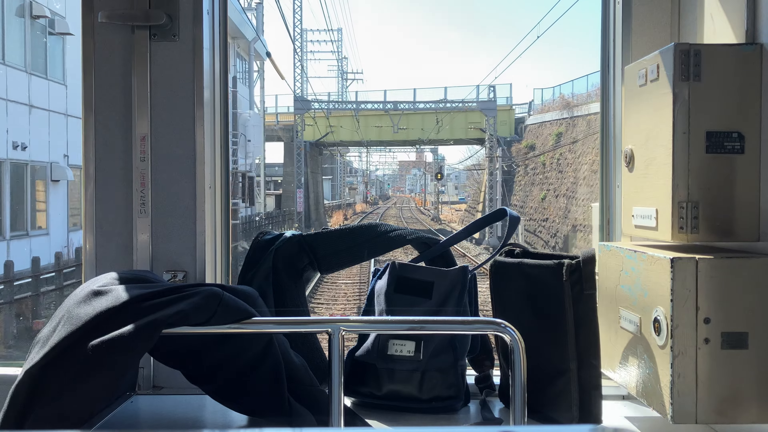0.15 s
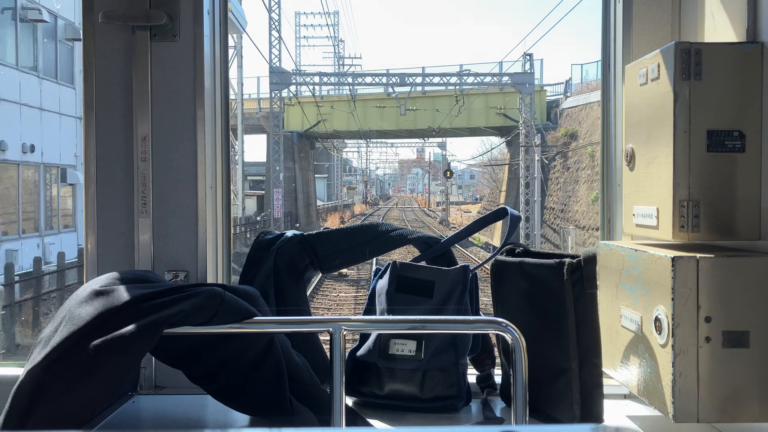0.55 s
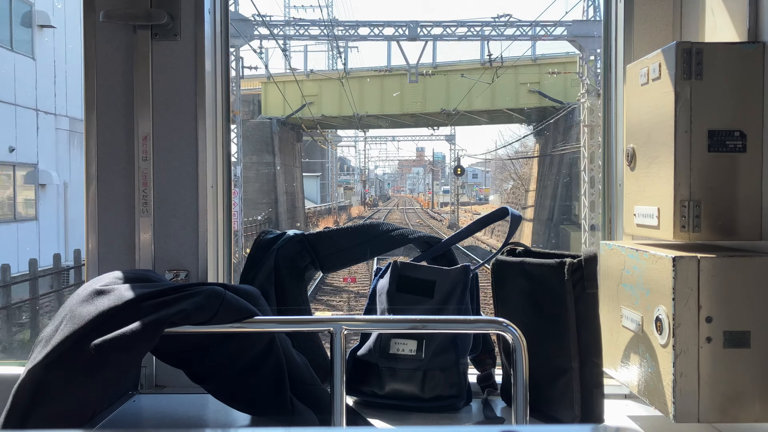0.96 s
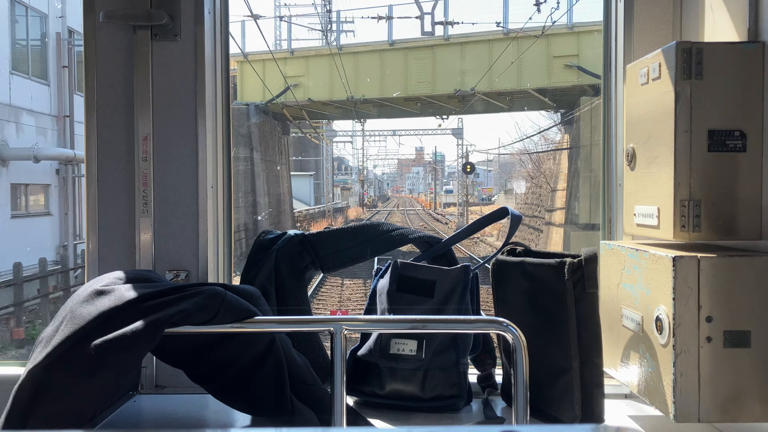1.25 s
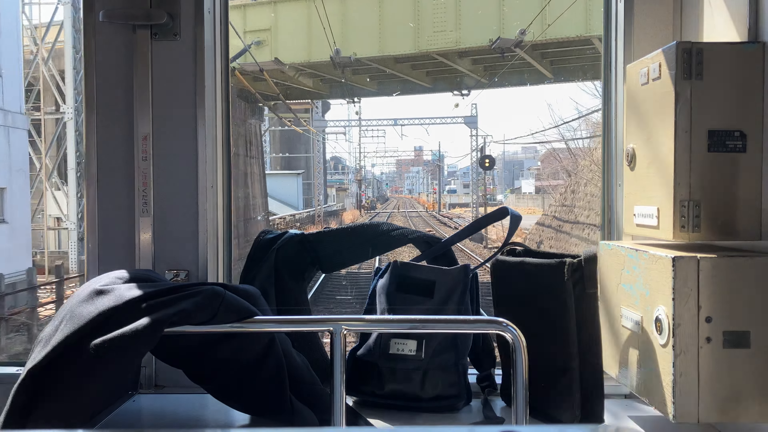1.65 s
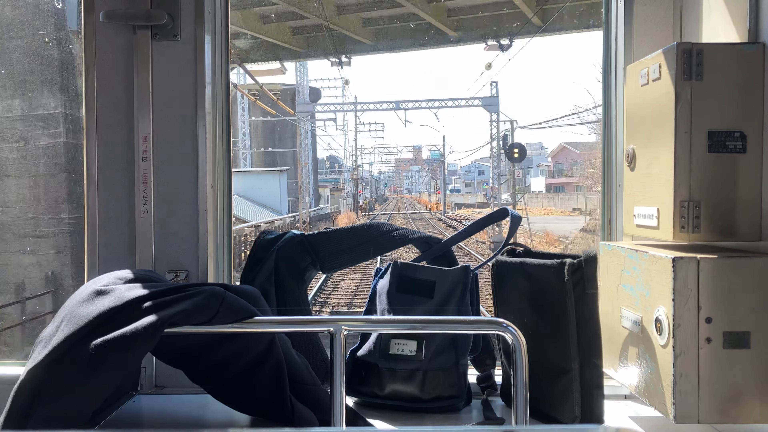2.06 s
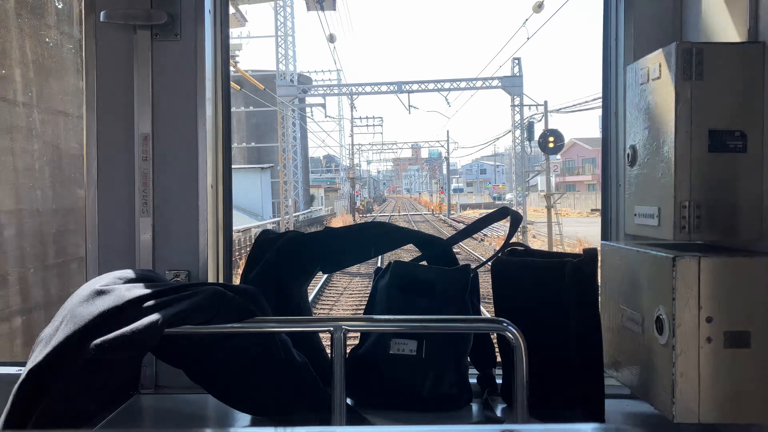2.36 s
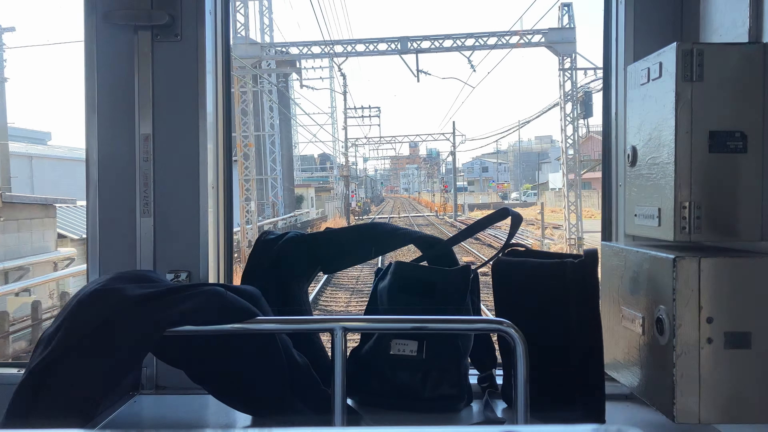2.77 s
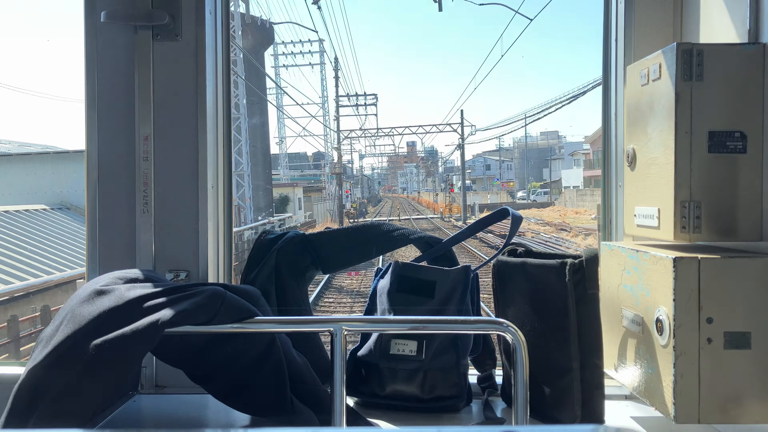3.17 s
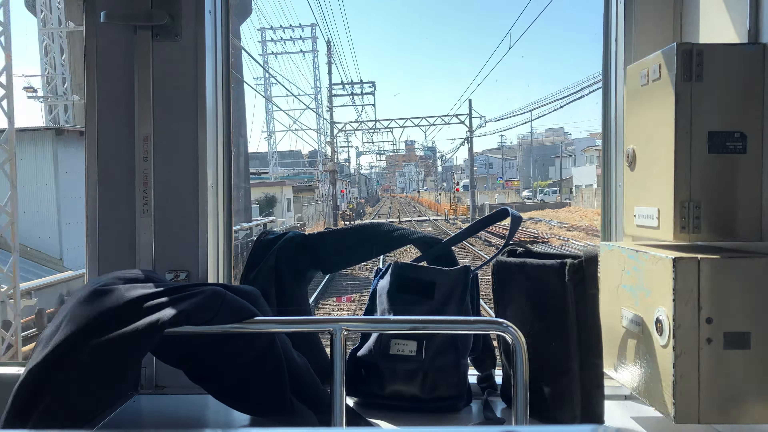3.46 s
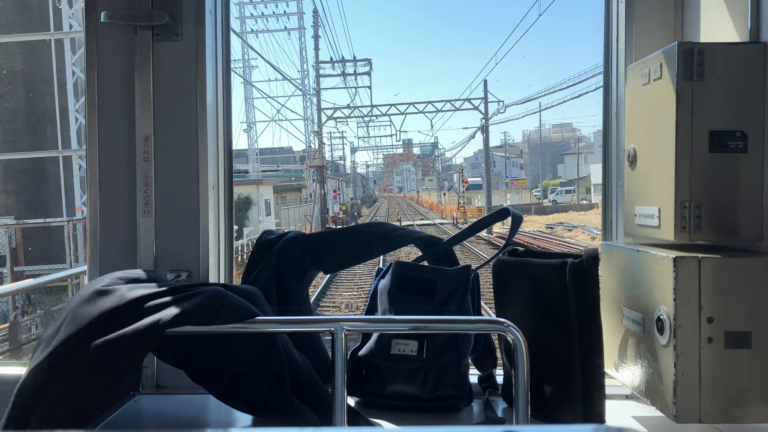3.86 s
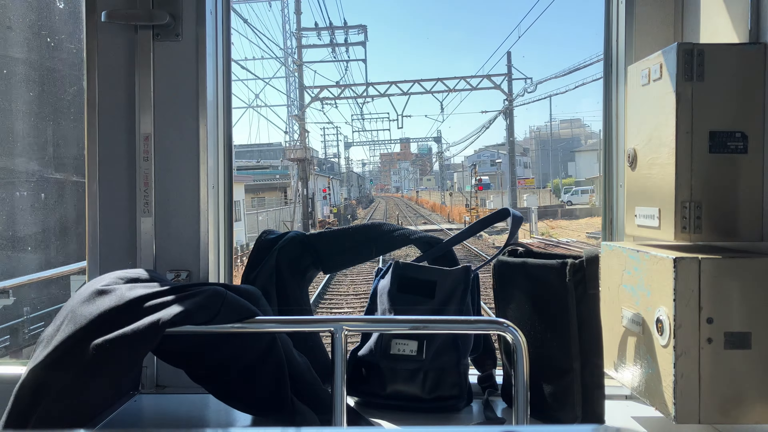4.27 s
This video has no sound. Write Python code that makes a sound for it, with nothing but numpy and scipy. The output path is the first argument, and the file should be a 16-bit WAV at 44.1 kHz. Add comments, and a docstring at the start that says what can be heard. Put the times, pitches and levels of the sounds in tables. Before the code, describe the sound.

Inside a front train car at steady speed, a bass-heavy floor rumble and body boom shake in uneven lumps under a mid-low wheel roar. A knock opens it, floor bumps cluster just after one second, sharp ticks come from a cab fitting near 2.7 and 4.1 seconds, and heavier joint thuds arrive near 3.9. Faint air hiss and a thin gear whine run along. Close stereo microphone in the enclosed cabin.

```python
"""Rough rails shake the floor and make the body boom in the front car of an electric train at steady speed.
Heard just behind the cab: shaped noise makes the floor, body and wheel roar, a wavering sine the gear whine.
Decaying modes make the thuds over rail joints, the floor's bumps over dips and the ticks of loose cab fittings.
Bands of noise make the air hiss, the brushing wheel flanges and a faint, very high sizzle."""
import sys
import numpy as np
from scipy import signal
from scipy.fft import rfft, irfft, next_fast_len
from scipy.io import wavfile
from scipy.ndimage import uniform_filter1d, map_coordinates

SR = 44100
rng = np.random.default_rng(int(sys.argv[2]) if len(sys.argv) > 2 else 0)


def log_audio(samples):
    """Write samples as a 16-bit WAV file to the path given in sys.argv[1]."""
    # one column per channel
    frames = np.atleast_2d(samples).T
    # limit to full scale, then quantise
    limited = np.clip(frames, -1, 1)
    pcm = np.round(limited * 32767).astype(np.int16)
    wavfile.write(sys.argv[1], SR, pcm)


N = 194833

# rise and fall of a rough stretch or a flange brush, and of a bounce or a passing wall (seconds)
JOLT_EDGE_S, BOUNCE_EDGE_S = 0.061, 0.08
# the floor and the body shake in random lumps: knots per second, depth in dB
LUMPS_PER_S, LUMPS_DB = 20, 2.1


def amp(db):
    """Decibels to gain."""
    return 10 ** (np.asarray(db) / 20)


def unit(x):
    """Scaled to rms 1."""
    return x / np.sqrt(np.mean(x ** 2) + 1e-20)


def along(points, hz):
    """(Hz, value) points read on a log frequency axis."""
    f, v = np.transpose(points)
    return np.interp(np.log(hz + 1), np.log(f + 1), v)


def curve(points):
    """(seconds, value) points as one value per sample, with rounded corners."""
    s, v = np.transpose(points)
    return uniform_filter1d(np.interp(np.arange(N) / SR, s, v), size=500)


def wobble(rate):
    """A smooth random curve through rate knots a second."""
    knots = rng.standard_normal(int(N * rate / SR) + 4)
    return map_coordinates(knots, [np.arange(N) * rate / SR], mode="nearest")


def swells(rows, edge_s):
    """A lift from (start s, length s, height) rows: each rises, holds and falls."""
    t = np.arange(N) / SR

    def ramp(x):
        return 0.5 + 0.5 * np.sin(np.pi * np.clip(x / edge_s, -0.5, 0.5))

    return sum(height * ramp(t - s) * ramp(s + length - t) for s, length, height in rows)


def burst(s, rise, t60):
    """The envelope of a blow at s seconds: a quick rise, then a fall of 60 dB in t60 seconds."""
    t = np.arange(SR) / SR
    start = max(round(s * SR), 0)
    envelope = (1 - np.exp(-t / rise)) * amp(-60 * t / t60)
    return np.pad(envelope, (start, N))[:N]


def filtered(x, response):
    """x shaped by a response, a function of frequency in Hz."""
    size = next_fast_len(N + SR // 2)
    hz = np.fft.rfftfreq(size, 1 / SR)
    return irfft(rfft(x, size) * response(hz), size)[..., :N]


def even(x, seconds):
    """Noise with its slow chance swells evened out, to a running rms near 1."""
    window = signal.windows.hann(int(seconds * SR))
    energy = signal.fftconvolve(np.mean(x ** 2, axis=0), window, "same")
    power = energy / signal.fftconvolve(np.ones(N), window, "same")
    return x / np.sqrt(np.abs(power) + 1e-9)


def panned(db):
    """Left and right gains for a left-right level difference."""
    return amp(np.array([db, -db]) / 2)


def body_db(hz):
    """The car body and the cabin air resonate, which lifts bands of the sound."""
    # Each row: centre in Hz, width in Hz, lift in dB.
    resonances = [(71.7, 4.7, 2.5), (105, 28, 1.5), (134.5, 11, 5.5), (178, 29, 2.5), (224, 28, 1),
                  (283, 53, 4.5), (370, 27, 4.5), (433, 9.6, 7.5), (560, 31, 3), (791, 81, 6.5),
                  (1057, 21, 3.5), (1274, 110, 4), (1510, 150, 0)]
    return sum(db / (1 + (2 * (hz - centre) / width) ** 2) for centre, width, db in resonances)


def ripple_db(hz):
    """The cabin's countless small resonances leave a fine ripple, steady in time and drawn at each call."""
    spacing_hz = 22
    depth_db = [(200, 0), (900, 1.7), (3000, 1.5), (6000, 0.8)]  # (Hz, dB)
    knots = rng.standard_normal(int(SR / 2 / spacing_hz) + 2)
    return along(depth_db, hz) * map_coordinates(knots, [hz / spacing_hz], mode="nearest")


def cabin_noise(spectrum):
    """Stereo noise of rms 1 in the cabin: alike in the bass, diffuse above, reaching the left side first."""
    # Likeness of left and right. Each row: frequency in Hz, likeness (1 is identical).
    alike = [(50, .995), (110, .96), (180, .84), (260, .58), (450, .52), (700, .32), (1200, .1),
             (9000, .08)]
    # Left-right balance. Each row: frequency in Hz, left minus right in dB.
    tilt = [(40, 3), (75, -1), (140, -1.5), (200, -0.5), (350, 4.5), (500, 1), (900, 3.5), (1900, 1.5),
            (2400, 4), (2950, 9.5), (3500, 3), (4300, 1), (5500, -5.5), (8000, -1.5)]
    lag_s = 0.0004

    def colour(hz):
        # the less alike the sides, the more of the noise goes to the difference signal
        turn = np.arccos(np.clip(along(alike, hz), -1, 1)) / 2
        shares = np.array([np.cos(turn) * amp(ripple_db(hz)), np.sin(turn) * amp(ripple_db(hz))])
        return amp(along(spectrum, hz) + body_db(hz)) * shares

    def ports(hz):
        # the left leads and the right trails by half the lag, which shrinks below 200 Hz
        delay_s = lag_s * np.clip(hz / 200, 0, 1)
        turns = np.exp(np.pi * hz * delay_s * np.array([[1j], [-1j]]))
        return panned(along(tilt, hz)) * turns

    mid, side = filtered(rng.standard_normal((2, N)), colour)
    return unit(filtered(np.array([mid + side, mid - side]), ports))


def favoured(modes, strongest_hz, focus_db, width_hz):
    """The point of contact favours the modes near one frequency; those far away lose focus_db."""
    def loss_db(hz):
        return focus_db * (1 - np.exp(-((hz - strongest_hz) / width_hz) ** 2))

    return [(hz, db - loss_db(hz), *rest) for hz, db, *rest in modes]


def ringing(s, modes, rise):
    """(Hz, dB, t60 s) modes struck at s seconds, their strengths varied a little; the left side leads."""
    t = np.arange(SR // 2) / SR
    lead_s = np.array([[0.0003], [0]])
    ring = 0
    for k, (hz, db, t60) in enumerate(modes):
        fall = amp(db + rng.normal() - 60 * t / t60)
        sense = (-1) ** k  # neighbours swing in opposite senses
        ring = ring + sense * fall * np.sin(2 * np.pi * hz * (t + lead_s))
    start = max(round(s * SR), 0)
    return np.pad(ring * (1 - np.exp(-t / rise)), ((0, 0), (start, N)))[:, :N]


def sizzle(db=-68, centre_hz=15350, width_hz=380):
    """A faint, very high band of hiss, alike on both sides."""
    def band(hz):
        return np.exp(-((hz - centre_hz) / width_hz) ** 2 / 2)

    return amp(db) * unit(filtered(rng.standard_normal(N), band))


def air(drift_db, level_db=-40.3):
    """Air and rail hiss leak in around the cab windows; walls beside the track throw the hiss back."""
    # Spectrum of the hiss. Each row: frequency in Hz, density in dB per Hz.
    hiss = [(900, -41), (1800, -3), (2300, 2.5), (2900, 2.5), (3250, 0), (3700, -4), (4500, -8.5),
            (5500, -15), (6500, -14), (7700, -19.5), (8700, -21), (10000, -109), (13000, -69), (16000, -55)]
    # Walls passing by. Each row: start in seconds, length in seconds, lift in dB.
    walls = [(1.05, 1.7, 0.8)]
    flutter_db = 0.55 * wobble(25)
    return amp(level_db + swells(walls, BOUNCE_EDGE_S) + drift_db + flutter_db) * cabin_noise(hiss)


def flanges(pan_db=4):
    """A flange brushes the rail and the wheel rings briefly in narrow, hoarse bands."""
    # Brushes of the flange. Each row: start in seconds, length in seconds, level in dB.
    brushes = [(.1, .14, -39.5), (1.2, .09, -45.5)]
    # Ring of the wheel. Each row: centre in Hz, width in Hz, strength in dB.
    wheel_ring = [(1480, 50, 1), (1710, 45, -1.5)]

    def bands(hz):
        return sum(amp(db) / (1 + (2 * (hz - centre) / width) ** 2) for centre, width, db in wheel_ring)

    ring = even(filtered(rng.standard_normal((2, N)), bands), seconds=0.1)
    gain = swells([(s, length, amp(db)) for s, length, db in brushes], JOLT_EDGE_S)
    return gain * panned(pan_db)[:, None] * ring


def gears(mesh_hz=847.0, pan_db=5):
    """The tooth mesh sings one softly wavering note, which flutters differently at each side."""
    # The whine comes and goes. Each row: time in seconds, level in dB.
    whine_level = [(0, -45), (.2, -48), (.3, -39), (.66, -37.5), (.77, -45), (1.05, -44), (1.35, -49),
                   (1.72, -57), (2.07, -35), (2.2, -44.5), (2.4, -40.5), (2.62, -44.5), (2.9, -37.5),
                   (3.06, -56), (3.45, -47.5), (3.57, -36), (3.72, -46.5), (3.98, -45), (4.25, -34),
                   (4.42, -44)]
    waver_hz, smear_rad, flutter_db = 1.2, 0.55, 2.6
    phase = 2 * np.pi * np.cumsum(mesh_hz + waver_hz * wobble(20)) / SR
    sides = []
    for shift_rad in (1.2, 0):
        flutter = amp(flutter_db * wobble(24))
        sides.append(flutter * np.sin(phase + shift_rad + smear_rad * wobble(50)))
    return amp(curve(whine_level)) * panned(pan_db)[:, None] * unit(np.array(sides))


def fittings():
    """Loose metal parts tick, and a short chatter of tiny uneven contacts follows."""
    # Each row: start in seconds, level in dB, strongest mode in Hz, loss of the other modes in dB,
    # ring t60 in seconds, chatter t60 in seconds, chatter level in dB, left minus right in dB.
    ticks = [(2.277, -33, 2050, -1, .04, 0.27, 0.5, 2.5), (2.282, -27, 2050, 4, 0.02, .03, -11, 9),
             (2.297, -26.5, 3250, 5, .022, .03, -12, 8), (2.683, -18, 2750, 5, 0.014, .03, -17, 9.5),
             (4.067, -19.5, 2520, 11, 0.02, .03, -23, 10), (4.316, -28, 2670, 4, .025, .065, -14, 11.5)]
    # Ring of the metal. Each row: frequency in Hz, strength in dB.
    metal = [(1320, 1), (2050, -2), (2520, 0), (2980, -1), (3250, -11), (4600, -20), (5500, -16)]
    # Spectrum of the chatter. Each row: frequency in Hz, density in dB per Hz.
    chatter_tone = [(500, -9), (1300, -7), (1900, -4.5), (3200, -1), (4200, -7), (7000, -23.5),
                    (12000, -50), (16000, -63.5)]
    rise_s, contacts_per_s, width_hz = 0.0007, 3200, 300
    contacts = (rng.random(N) < contacts_per_s / SR) * rng.standard_normal((2, N))
    chatter = even(filtered(contacts, lambda hz: amp(along(chatter_tone, hz))), seconds=0.029)
    out = np.zeros((2, N))
    for s, db, strongest_hz, focus_db, ring_t60, chatter_t60, chatter_db, pan_db in ticks:
        modes = [(hz, level, ring_t60) for hz, level in favoured(metal, strongest_hz, focus_db, width_hz)]
        tick = ringing(s, modes, rise_s)
        tail = amp(chatter_db) * burst(s, 2 * rise_s, chatter_t60) * chatter
        out += amp(db) * panned(pan_db)[:, None] * (tick + tail)
    return out


def bumps(rise_s=0.0087, t60_s=0.13):
    """A dip in the rail pushes the floor, which swings a few cycles and stops."""
    # Each row: start in seconds, level in dB, pitch in Hz.
    dips = [(0.483, -12, 70), (0.776, -12, 68.6), (1.065, -8, 78.4), (1.114, -8, 89), (1.21, -2, 87.6),
            (1.267, -3, 113), (1.305, -8, 101), (1.849, -7, 66), (2.066, -5.5, 84), (2.581, -15, 108),
            (2.885, -7.5, 75.7), (3.104, -7.5, 97), (3.188, -9.5, 113), (3.335, -10, 135.5),
            (3.629, -7.5, 145), (4.165, -16, 107)]
    return sum(ringing(s, [(hz, db, t60_s)], rise_s) for s, db, hz in dips)


def joints():
    """Axles cross joints and welds: the bogie and floor ring with a full knock, and the body clatters."""
    # Each row: start in seconds, level in dB, strongest mode in Hz, spread around it in Hz,
    # clatter level in dB, left minus right in dB.
    crossings = [(0, -12, 200, 30, -7, -1), (0.18, -16, 285, 25, -10.5, 1.5), (0.6, -18, 265, 40, -11, 1),
                 (1.09, -22, 330, 30, -6.5, 1), (1.209, -20, 250, 30, -10, 6.5),
                 (2.463, -17.5, 285, 30, -10, -2), (3.851, -9.5, 213, 42, -15, 4),
                 (3.904, -14, 285, 20, -20, 0), (3.969, -11, 255, 20, -13, 0), (3.99, -19, 190, 25, -8, -1),
                 (4.344, -12.5, 218, 35, -8, 4)]
    # Bogie and floor under a blow. Each row: frequency in Hz, strength in dB, t60 in seconds.
    bogie = [(184, -1, .27), (218, 2, 0.2), (255, 0, 0.17), (286, 0, 0.17), (338, 2, 0.09), (418, -7, 0.22),
             (516, -15, .3), (605, -19, 0.3)]
    # Spectrum of the clatter. Each row: frequency in Hz, density in dB per Hz.
    clatter_tone = [(60, -34), (140, -23), (195, -4), (290, -2.5), (380, -6), (520, -11.5), (800, -18.5),
                    (1500, -26.5), (5000, -43), (12000, -71.5)]
    rise_s, focus_db = 0.01, 8
    clatter = even(cabin_noise(clatter_tone), seconds=0.018)
    out = np.zeros((2, N))
    for s, db, strongest_hz, spread_hz, clatter_db, pan_db in crossings:
        knock = ringing(s, favoured(bogie, strongest_hz, focus_db, spread_hz), rise_s)
        tail = amp(clatter_db) * clatter * burst(s, rise_s, t60=0.45)
        out += amp(db) * panned(pan_db)[:, None] * (knock + tail)
    return out


def springs(level_db=-41.5):
    """The air springs throb in the deep bass, louder when the car bounces on them."""
    # Spectrum of the throb. Each row: frequency in Hz, density in dB per Hz.
    throb_tone = [(10, -28), (24, -12.5), (34, 5.5), (44, 22.5), (50, 17.5), (65, -48)]
    # Bounces of the car. Each row: start in seconds, length in seconds, lift in dB.
    bounces = [(.1, .44, 1), (.86, 0.12, 8.5), (2.48, 0.18, 7.5)]
    return amp(level_db + swells(bounces, BOUNCE_EDGE_S)) * even(cabin_noise(throb_tone), seconds=0.47)


def wheels(rough_db, level_db=-26.5, flutter_db=1.17):
    """The wheels roar on the rough rail, and the roar flutters."""
    # Spectrum of the roar. Each row: frequency in Hz, density in dB per Hz.
    roar_tone = [(100, -5.5), (170, -9.5), (210, -5), (300, -2.5), (400, -4), (520, -4.5), (660, -7.5),
                 (820, -10), (950, -13), (1400, -14.5), (1900, -19), (3000, -24), (4500, -46), (9000, -89)]
    return amp(level_db + rough_db + flutter_db * wobble(28)) * even(cabin_noise(roar_tone), seconds=0.54)


def body(jolt_db, boom_db, jolt_share=0.43):
    """The body panels boom in lumps and take a share of the floor's jolts."""
    # Spectrum of the boom. Each row: frequency in Hz, density in dB per Hz.
    boom_tone = [(70, -70.5), (105, -3), (130, -4), (175, -2), (205, -12.5), (280, -21), (600, -100.5)]
    lumps_db = LUMPS_DB * wobble(LUMPS_PER_S)
    return amp(boom_db + jolt_share * jolt_db + lumps_db) * even(cabin_noise(boom_tone), seconds=0.15)


def floor(jolt_db, boom_db, level_db=-22.5, boom_share=0.071):
    """The floor rumbles in lumps and faintly follows the boom's slow rise and fall."""
    # Spectrum of the rumble. Each row: frequency in Hz, density in dB per Hz.
    rumble_tone = [(30, -59), (45, -13.5), (55, 1), (70, 4), (100, 0.5), (120, -5), (170, -48.5),
                   (400, -77)]
    follow_db = boom_share * (boom_db - boom_db.mean())
    lumps_db = LUMPS_DB * wobble(LUMPS_PER_S)
    return amp(level_db + follow_db + jolt_db + lumps_db) * even(cabin_noise(rumble_tone), seconds=0.15)


def rolling(drift_db):
    """Rail roughness drives the springs, the wheels, the body panels and the floor together."""
    # Rough and smooth stretches of rail that swell or calm the sound.
    # Each row: start in seconds, length in seconds, rumble lift in dB, roar lift in dB.
    stretches = [(0, 0.19, -4, 2), (0.996, 0.062, -1.5, -1), (1.087, 0.21, 1.5, 0.5),
                 (1.36, 0.048, -9, -1.5), (1.58, 0.15, 3.5, -0.5), (1.899, 0.041, -6.5, -1),
                 (2.027, 0.22, 2, 0.5), (2.39, .22, 0, 2), (2.8, 0.23, 1.5, 0), (2.943, .14, -3, 0),
                 (3.26, 0.16, 1, 0), (3.732, 0.056, -3, 0.5), (3.98, 0.17, 0.5, -0.5)]
    # The body boom builds up in the second half. Each row: time in seconds, level in dB.
    boom_level = [(0, -25), (.9, -27.5), (1.28, -25), (1.42, -30.5), (2.35, -26), (2.6, -24.5), (3, -24),
                  (3.35, -22), (3.75, -26), (4.42, -21)]
    jolt_db = swells([(s, length, db) for s, length, db, _ in stretches], JOLT_EDGE_S)
    rough_db = swells([(s, length, db) for s, length, _, db in stretches], JOLT_EDGE_S)
    boom_db = curve(boom_level)
    ride = springs() + wheels(rough_db) + body(jolt_db, boom_db) + floor(jolt_db, boom_db)
    return amp(drift_db) * ride


def scene():
    """Everything heard inside the car; a slow drift of the rail's roughness moves rolling and hiss alike."""
    drift_db = 0.38 * wobble(1.134)
    background = sizzle() + air(drift_db) + flanges() + gears()
    blows = fittings() + bumps() + joints()
    return background + blows + rolling(drift_db)


def record(dry, top_hz=15800):
    """A sharp band limit: nothing at or above top_hz passes."""
    return filtered(dry, lambda hz: hz < top_hz)


dry = scene()
out = record(dry)
log_audio(out)
```